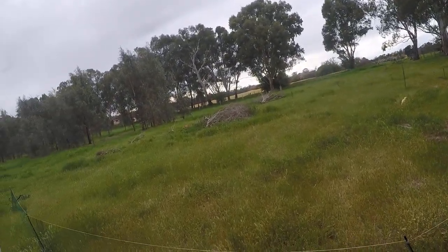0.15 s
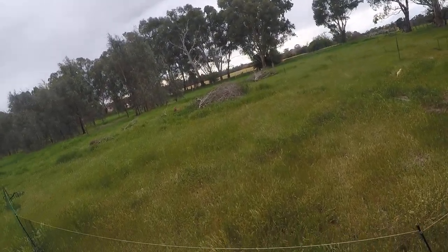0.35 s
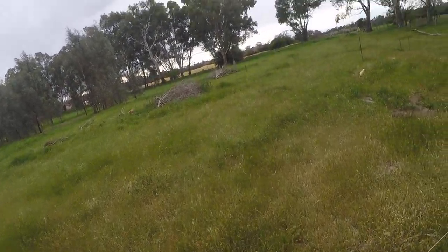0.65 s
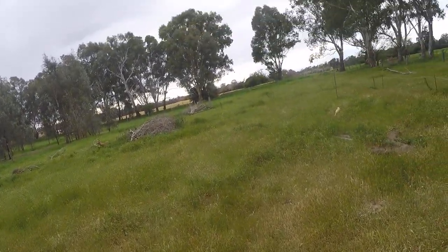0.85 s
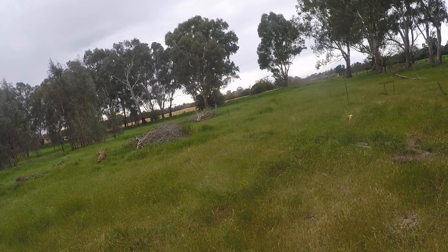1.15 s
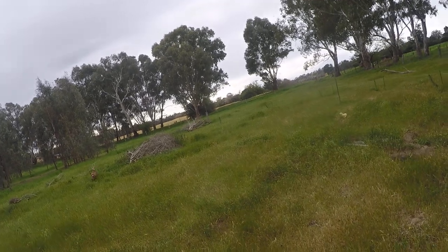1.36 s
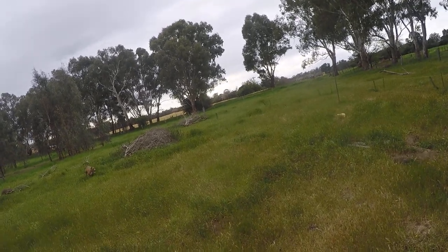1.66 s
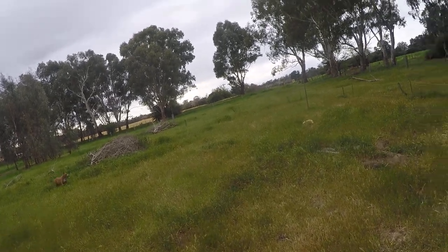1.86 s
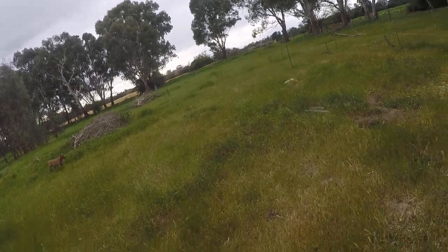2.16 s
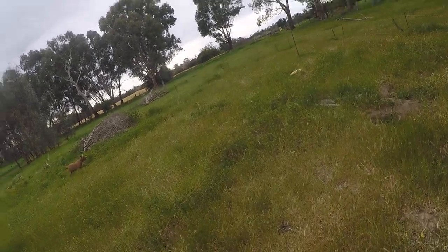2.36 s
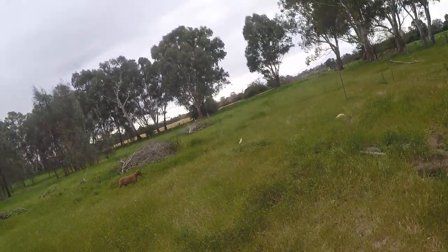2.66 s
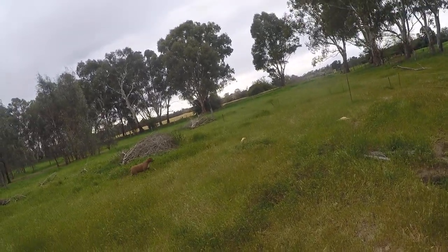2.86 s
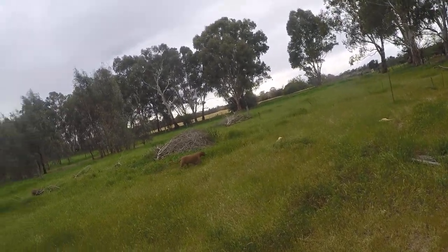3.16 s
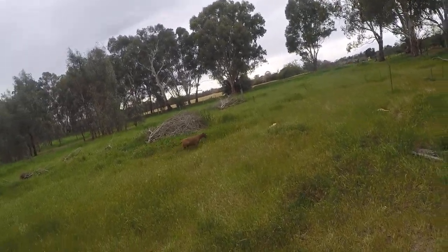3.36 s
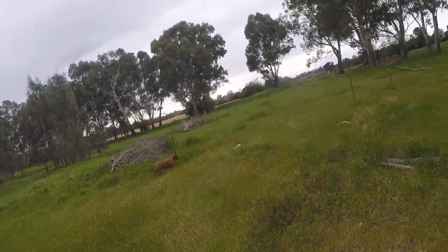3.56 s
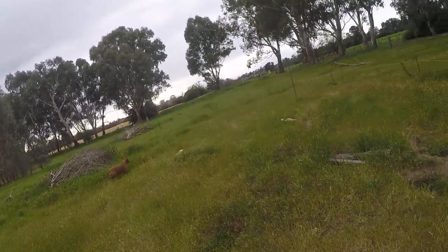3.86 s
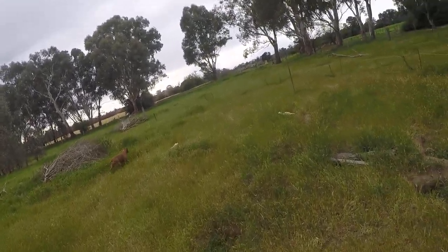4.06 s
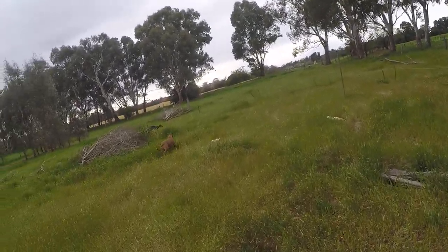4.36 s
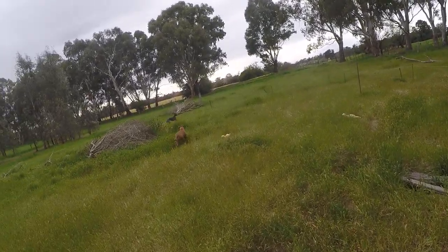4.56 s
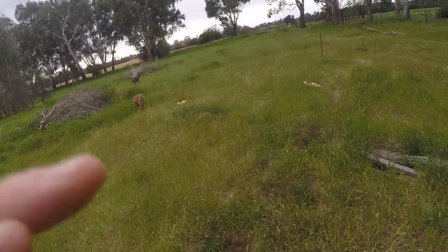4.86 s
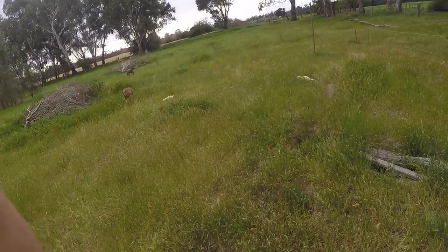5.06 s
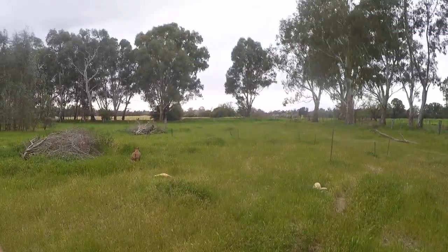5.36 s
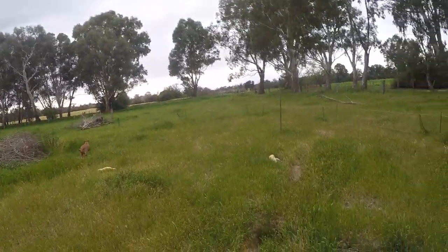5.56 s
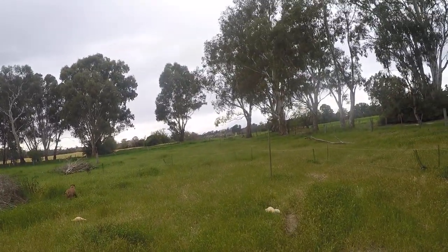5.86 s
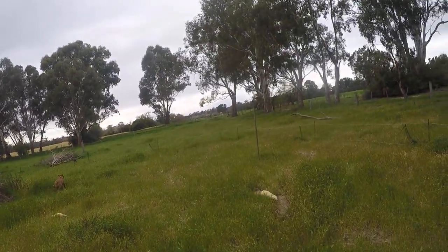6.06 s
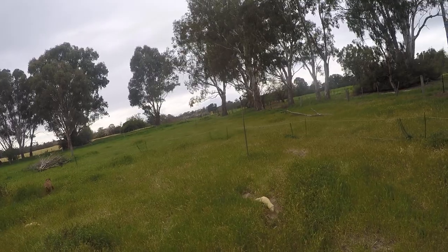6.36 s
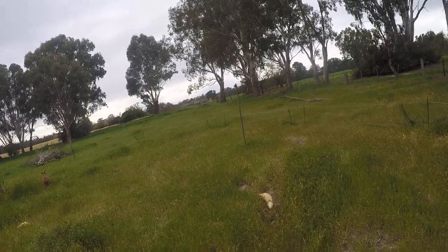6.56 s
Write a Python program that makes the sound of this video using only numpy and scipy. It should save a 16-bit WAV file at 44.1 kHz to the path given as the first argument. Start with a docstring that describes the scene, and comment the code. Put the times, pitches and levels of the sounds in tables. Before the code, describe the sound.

Outdoors in light wind, a walker's steps arrive as muffled sub-bass bumps at a body-worn microphone. The plastic mount knocks, clicks and creaks irregularly, with faint cloth scrapes. Around five seconds a hard crack starts a dense, gritty burst of hand rubbing with hiss and rumble, ending in a short sliding scrape. Afterwards only low wind, faint tree rush, soft scrapes and one last dull step remain.

```python
"""Footfalls through a grassy paddock, heard from a small camera worn by the walker: each is a low pressure swing.
The camera rocks in its plastic mount with knocks and clacks, sums of short modes; its joint creeps in tiny slips.
Soft scrapes of cloth and the settling mount, then a hand rubbing and sliding close to the microphone, are
random slips through resonances of the case, with hiss and rumble direct from the hand.
Light wind rumbles at the microphone over the faint rush of far trees, both shaped noise, with a thin steady whine."""
import sys
import numpy as np
from scipy import signal
from scipy.fft import rfft, irfft, next_fast_len
from scipy.io import wavfile
from scipy.ndimage import map_coordinates

SR = 44100
rng = np.random.default_rng(int(sys.argv[2]) if len(sys.argv) > 2 else 0)


def store_pcm(level_fs):
    """Save levels as 16-bit WAV."""
    pcm = np.round(np.clip(level_fs, -1, 1) * 32767).astype(np.int16)
    wavfile.write(sys.argv[1], SR, np.atleast_2d(pcm).T)


N = 296173  # length [samples]

# Air moving past the microphone, before WIND_GAIN_DB: (time [s], level [dB])
WIND = [(0.0, -43.5), (0.37, -46), (0.62, -51), (1.53, -51.5), (1.91, -49), (2.15, -40.5), (2.26, -45.5),
        (2.47, -48), (2.8, -52), (3.07, -49), (3.29, -45.5), (3.85, -44), (4.12, -48), (4.98, -50),
        (5.18, -39), (5.33, -43), (5.91, -47.5), (6.72, -48.5)]
WIND_GAIN_DB = 13.5
# Relative spectrum of wind, also of the rumble under the hand: (frequency [Hz], level [dB])
WIND_COLOUR = [(10, -12.5), (24, 11.5), (45, 7), (70, 0), (120, -10.5), (200, -16), (280, -21),
               (400, -31.5), (700, -41), (1500, -61), (5000, -100)]
# Relative spectrum of far trees and faint hiss: (frequency [Hz], level [dB])
AIR_COLOUR = [(300, -11), (500, -12), (800, -8), (1200, -6.5), (1800, -13), (2700, -9.5), (4000, -14),
              (7500, -22), (9000, -20.5), (15500, -27.5)]

# Footfalls swaying the body: (time of centre [s], peak level [dB], half length to 1/e [s])
STEPS = [(.391, -25.5, 0.039), (0.545, -22.5, 0.038), (1.048, -14, 0.047), (1.139, -20.5, 0.048),
         (2.102, -6.5, .038), (2.26, -15, .017), (2.382, -22, 0.015), (3.267, -11.5, 0.044),
         (3.927, -14, 0.044), (4.085, -18.5, 0.02), (4.598, -10.5, 0.04), (5.014, -14.5, .018),
         (5.138, -11.5, 0.0173), (5.314, -11.5, 0.026), (5.67, -5.5, 0.017), (5.822, -19, 0.071),
         (6.455, -14, 0.048)]
# Pitch and half length of a usual sway; the exponent makes shorter jolts swing faster
SWAY_HZ, SWAY_HALF_S, SWAY_STIFFENS = 27.1, 0.04, 0.2

# Stroke levels in the tables below are before the flutter of pressure and the mix gains in rubbing().
# Attack and release times span 60 dB, before the stretch for longer strokes.
LONG_STROKE_S = 0.07  # a stroke this long takes hold and lets go twice as slowly as a flick
# Soft scrapes on the case: cloth brushing it, and the mount settling after knocks:
# (start [s], length [s], level [dB])
SCRAPES = [(.49, 0.029, -55.5), (.643, .016, -60.5), (1.157, 0.016, -56), (1.24, 0.03, -60),
           (2.12, .045, -57.5), (2.175, .055, -53), (2.24, 0.021, -37), (2.788, 0.022, -58.5),
           (3.385, .022, -47.5), (3.46, 0.018, -61), (5.01, 0.014, -51.5), (6.16, 0.042, -50.5),
           (6.31, .16, -54), (6.49, .11, -52.5)]
SCRAPE_ATTACK_S, SCRAPE_RELEASE_S = 0.11, 0.09
# Dull drag within the soft scrapes: (frequency [Hz], width [Hz], level [dB])
DRAG_MODES = [(240, 130, 0)]
DRAG_DB = -1  # relative to the scrape
# The hand rubs across the case: (start [s], length [s], level [dB])
RUBS = [(5.08, .04, -31.5), (5.14, .075, -40), (5.225, .02, -36), (5.25, .12, -31.5), (5.37, 0.046, -33.5),
        (5.478, .03, -36), (5.515, .06, -37), (5.6, 0.032, -42.5)]
RUB_ATTACK_S, RUB_RELEASE_S = 0.068, 0.062
RUB_HISS_DB, RUB_RUMBLE_DB = -19.5, 8  # relative to the rub; the hiss before HISS_GAIN_DB
RUB_SPREAD_DB = 4.5  # unevenness of the slips
# Resonances of the case under scraping and rubbing: (frequency [Hz], width [Hz], level [dB])
CASE = [(282, 79, -4), (486, 470, -7), (764, 140, 0.5), (1285, 150, -0.5), (1780, 580, -8.5),
        (2470, 240, -4), (3310, 190, -12.5), (3593, 510, -16.5)]
# A finger swipes right over the microphone opening: (start [s], length [s], level [dB])
SWIPES = [(5.054, .061, -31), (5.17, 0.0058, -48), (5.642, 0.013, -38.5)]
SWIPE_ATTACK_S, SWIPE_RELEASE_S = 0.006, 0.035
# The hand slides away along the case: (start [s], length [s], level [dB])
SLIDES = [(5.66, 0.228, -30.5), (5.953, 0.033, -37)]
SLIDE_ATTACK_S, SLIDE_RELEASE_S = 0.03, 0.037
SLIDE_EASE_DB_PER_S = 49  # the pressure eases during each slide
SLIDE_HISS_DB, SLIDE_RUMBLE_DB = -17, 16  # relative to the slide stroke; the hiss before HISS_GAIN_DB
LEAVING_DB_PER_S = 131.5  # extra fade of hiss and rumble as the hand leaves the opening
# Resonances of the case under the sliding hand: (frequency [Hz], width [Hz], level [dB])
SLIDE_MODES = [(770, 660, -6), (1334, 165, 3.5), (1830, 118, 4), (2530, 160, 2.5), (3080, 350, -8),
               (3930, 700, -14.5), (5350, 1100, -28.5)]
SLIDE_GAIN_DB, HISS_GAIN_DB = 0.84, 1.5
# Relative spectrum of friction hiss: (frequency [Hz], level [dB])
HISS_COLOUR = [(1500, -22.5), (2600, -9), (4000, -5.5), (4850, -5), (5500, -10), (8000, -9), (9200, -14),
               (10600, -11), (11500, -11.5), (12600, -10), (13400, -21.5), (15500, -13.5)]

# Blow levels scale the sum of the modes. Tilts act above and below 1400 Hz; positive is stronger.
# Small catches while things rub on the case:
# (time [s], level [dB], treble tilt [dB/octave], bass tilt [dB/octave])
CATCHES = [(1.233, -41.5, -5, 3), (2.5227, -32, -17, -4), (5.0774, -22, 1, 5.5), (5.084, -14, -4.5, -0.5),
           (5.5152, -23, 4.5, 5.5), (5.533, -26, 5.5, -9)]
# The mount meets its soft stop: (time [s], level [dB], treble tilt [dB/octave], bass tilt [dB/octave])
KNOCKS = [(2.2406, 0.2, 5, -0.5), (2.7225, -54.5, -15, 7.5), (3.2557, -18, -5.5, -0.5),
          (3.3603, -12.5, 1.5, -0.2), (3.3894, -21, 3, -4), (3.8514, -17.5, -2, -0.3),
          (3.9616, -24.5, -8, -2.5), (4.7104, -22, -1.5, 1), (5.0027, 1.5, 14, 0), (5.0245, -22.5, 2, 0)]
# What the soft stop rings with, before tilt: (frequency [Hz], swell time [ms], level [dB])
KNOCK_MODES = [(126, 3.6, -4.5), (222, 2.14, 0.5), (480, 4, -12.5), (766, 3.33, -9.5), (1396, 2.1, -6.5),
               (1511, 1.5, -7), (1830, 3.1, -22), (2408, 2.1, -15.5), (2587, 2.46, -20.5),
               (3240, 0.88, -22.5), (3960, 1.5, -37), (5450, 0.94, -38.5)]
# The mount meets its hard stop: (time [s], level [dB], treble tilt [dB/octave], bass tilt [dB/octave])
CLACKS = [(2.3652, -5, -0.5, 0.05), (2.4812, -12, 0.8, -0.5), (3.9376, -19.5, -2.5, 3),
          (4.0725, -8.5, 2.2, 0), (5.6419, -5, -8, -1.5)]
# What the hard stop rings with, before tilt: (frequency [Hz], swell time [ms], level [dB])
CLACK_MODES = [(112, 4, -17.5), (250, 4.2, -18.5), (651, 2.1, -15.5), (1350, 1.68, -5), (1463, 2.6, -11.5),
               (1720, 1.7, -13.5), (2320, 1.9, -6.5), (2435, 2.9, -13.5), (2740, 1.5, -19),
               (3500, 1.4, -21), (3890, 1.5, -20), (7100, 0.11, -32.5)]
# The joint of the mount creeps after a clack: (start [s], length [s], level [dB])
CREEPS = [(2.392, .018, -41.5), (2.495, 0.036, -49), (2.522, 0.019, -44), (2.555, 0.099, -54),
          (3.955, .04, -60), (4.02, 0.027, -35.5), (4.088, 0.0097, -37)]
CREEP_ATTACK_S, CREEP_RELEASE_S = 0.06, 0.045
CREEP_HISS_DB = -26  # relative to the creep

WHINE_HZ, TOP_HZ = 8631.6, 15500  # electronic whine; upper limit of the camera's treble
CEILING_DB = -0.8  # limit the camera's peaks bend towards


def amp(db):
    """Decibels to gain."""
    return 10 ** (np.asarray(db) / 20)


def unit(x):
    """Scale to rms 1."""
    return x / np.sqrt(np.mean(x ** 2) + 1e-20)


def level(rows):
    """Gain per sample, interpolated in dB from (time [s], level [dB]) rows."""
    return amp(np.interp(np.arange(N) / SR, *np.transpose(rows)))


def wobble(rate):
    """A smooth random curve through `rate` random knots a second."""
    knots = rng.standard_normal(int(N * rate / SR) + 4)
    return map_coordinates(knots, [np.arange(N) * rate / SR])


def filtered(x, response):
    """Multiply the spectrum of x by a response of frequency."""
    size = next_fast_len(N + 8192)  # spare room for the filter's tail
    spectrum = rfft(x, size) * response(np.fft.rfftfreq(size, 1 / SR))
    return irfft(spectrum, size)[:N]


def coloured(x, points):
    """Shape x by a (frequency [Hz], level [dB]) spectrum, at rms 1."""
    hz, db = np.transpose(points)
    return unit(filtered(x, lambda f: amp(np.interp(np.log(f + 1), np.log(hz), db))))


def resonant(x, modes, edge_hz):
    """Pass x through parallel resonances and the case's treble roll-off, at rms 1."""
    def response(f):
        body = 0
        for k, (hz, width, db) in enumerate(modes):
            resonance = 1j * f * width / (hz * hz - f * f + 1j * f * width)
            body = body + (-1) ** k * amp(db) * resonance  # neighbours in opposite polarity
        return body / np.sqrt(1 + (f / edge_hz) ** 10)

    return unit(filtered(x, response))


def slips(rate, spread_db):
    """Friction: a dense random train of tiny slips, `rate` a second, of uneven size, at rms 1."""
    happens = rng.random(N) < rate / SR
    sign = rng.choice([-1, 1], N)
    size = amp(spread_db * rng.standard_normal(N))
    return unit(happens * sign * size)


def strokes(rows, attack_s, release_s, ease_db_per_s=0):
    """Gain per sample of (start [s], length [s], level [dB]) strokes that take hold, may ease, and let go."""
    t = np.arange(N) / SR
    gain = np.zeros(N)
    for start, length, db in rows:
        before = np.maximum(start - t, 0) / attack_s
        after = np.maximum(t - start - length, 0) / release_s
        slowness = 1 + length / LONG_STROKE_S
        eased_db = db - ease_db_per_s * np.clip(t - start, 0, length)
        gain = np.maximum(gain, amp(eased_db - 60 * (before + after) / slowness))
    return gain


def ring(modes, treble_db, bass_db, pivot_hz=1400):
    """One blow: each mode swells as the blow spreads through the plastic and dies within milliseconds."""
    t = np.arange(SR // 20) / SR
    hz, swell_ms, db = np.transpose(modes)[:, :, None]
    age = 1000 * t / swell_ms  # 1 at the height of the swell
    envelope = (age * np.exp(1 - age)) ** 2
    octaves = np.log2(hz / pivot_hz)
    tilt = treble_db * np.maximum(octaves, 0) - bass_db * np.minimum(octaves, 0)
    return np.sum(amp(db + tilt) * envelope * np.sin(2 * np.pi * hz * t), axis=0)


def blows(rows, modes, chatter_db, chatter_t60):
    """Contacts in the mount, each with its own tilt; the parts chatter briefly as they settle."""
    out = np.zeros(N + SR)
    t = np.arange(SR // 10) / SR
    for time, db, treble_db, bass_db in rows:
        blow = ring(modes, treble_db, bass_db)
        noise = rng.standard_normal(len(t))
        clatter = signal.fftconvolve(noise, ring(CLACK_MODES, treble_db=-1.0, bass_db=-4.5))
        chatter = unit(clatter[:len(t)])
        start = round(time * SR)
        out[start:start + len(blow)] += amp(db) * blow
        out[start:start + len(t)] += amp(db + chatter_db - 60 * t / chatter_t60) * chatter
    return out[:N]


def paddock():
    """Lumpy wind rumble at the microphone over the faint, slowly varying rush of far trees."""
    gusty_noise = rng.standard_normal(N) * amp(1.8 * wobble(9.5))
    rumble = coloured(gusty_noise, WIND_COLOUR)
    trees = coloured(rng.standard_normal(N), AIR_COLOUR) * amp(0.58 * wobble(4.7))
    return amp(WIND_GAIN_DB) * level(WIND) * rumble + amp(-63.0) * trees


def footfalls():
    """Each step sways the camera: a few cycles of very low pressure swing."""
    out = np.zeros(N)
    for centre, db, half in STEPS:
        hz = SWAY_HZ * (SWAY_HALF_S / half) ** SWAY_STIFFENS
        t = np.arange(N) / SR - centre
        near = np.abs(t) < 4 * half
        envelope = np.exp(-(t[near] / half) ** 2)
        out[near] += amp(db) * envelope * np.cos(2 * np.pi * hz * t[near])
    return out


def rubbing():
    """Slips of scrapes and skin sound the case; at the microphone opening skin also gives hiss and rumble."""
    scraping = strokes(SCRAPES, SCRAPE_ATTACK_S, SCRAPE_RELEASE_S)
    hand = strokes(RUBS, RUB_ATTACK_S, RUB_RELEASE_S)
    finger = strokes(SWIPES, SWIPE_ATTACK_S, SWIPE_RELEASE_S)
    sliding = strokes(SLIDES, SLIDE_ATTACK_S, SLIDE_RELEASE_S, SLIDE_EASE_DB_PER_S)
    since_first_slide = np.maximum(np.arange(N) / SR - SLIDES[0][0], 0)
    leaving = sliding * amp(-LEAVING_DB_PER_S * since_first_slide)
    pressure = amp(1.7 * wobble(60) + 0.84 * wobble(300))  # the surfaces catch and let go

    rub = (scraping + hand) * resonant(slips(rate=2600, spread_db=RUB_SPREAD_DB), CASE, edge_hz=5900)
    drag_tone = resonant(slips(rate=2000, spread_db=2), DRAG_MODES, edge_hz=420)
    drag = amp(DRAG_DB) * scraping * drag_tone
    slide = sliding * resonant(slips(rate=5000, spread_db=0.5), SLIDE_MODES, edge_hz=7700)

    hiss_gain = finger + amp(RUB_HISS_DB) * hand + amp(SLIDE_HISS_DB) * leaving
    hiss = hiss_gain * coloured(slips(rate=6400, spread_db=1), HISS_COLOUR)
    rumble_gain = amp(RUB_RUMBLE_DB) * hand + amp(SLIDE_RUMBLE_DB) * leaving
    rumble = rumble_gain * coloured(rng.standard_normal(N), WIND_COLOUR)
    return pressure * (rub + drag + amp(SLIDE_GAIN_DB) * slide + amp(HISS_GAIN_DB) * hiss) + rumble


def clacks_and_catches():
    """Sharp contacts on the hard stop, and small catches on the case that ring the same modes."""
    return blows(list(CLACKS) + list(CATCHES), CLACK_MODES, chatter_db=-14.5, chatter_t60=0.037)


def knocks():
    """Dull contacts on the soft stop, ringing its own modes."""
    return blows(KNOCKS, KNOCK_MODES, chatter_db=-24.0, chatter_t60=0.056)


def creeping_joint():
    """The joint creeps in tiny slips that ring the mount's modes, with a little hiss."""
    mount_ring = ring(CLACK_MODES, treble_db=1.5, bass_db=2)
    joint = signal.fftconvolve(slips(rate=1700, spread_db=2), mount_ring)[:N]
    hiss = amp(CREEP_HISS_DB) * coloured(slips(rate=6400, spread_db=4.5), HISS_COLOUR)
    return strokes(CREEPS, CREEP_ATTACK_S, CREEP_RELEASE_S) * (unit(joint) + hiss)


def scene():
    """Everything at the one microphone."""
    mount = clacks_and_catches() + knocks() + creeping_joint()
    return (paddock() + footfalls() + rubbing() + mount)[None]


def record(dry, whine_db=-76):
    """The camera adds a thin electronic whine, clips the highest peaks softly and cuts the top treble."""
    whine = np.sqrt(2) * np.sin(2 * np.pi * WHINE_HZ * np.arange(N) / SR)  # rms 1
    x = dry[0] + amp(whine_db) * whine
    x = x / (1 + np.abs(x / amp(CEILING_DB)) ** 8) ** (1 / 8)
    return filtered(x, lambda f: f < TOP_HZ)[None]


dry = scene()
out = record(dry)
store_pcm(out)
```